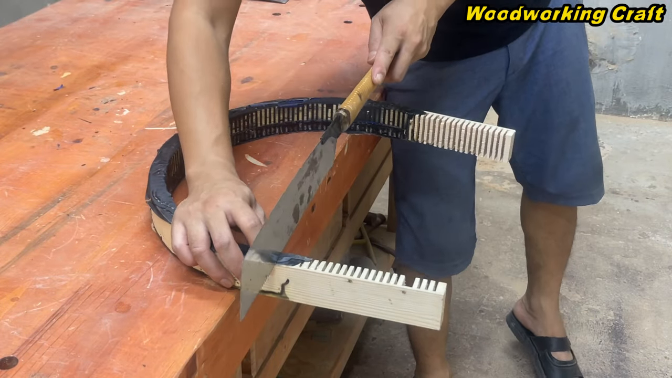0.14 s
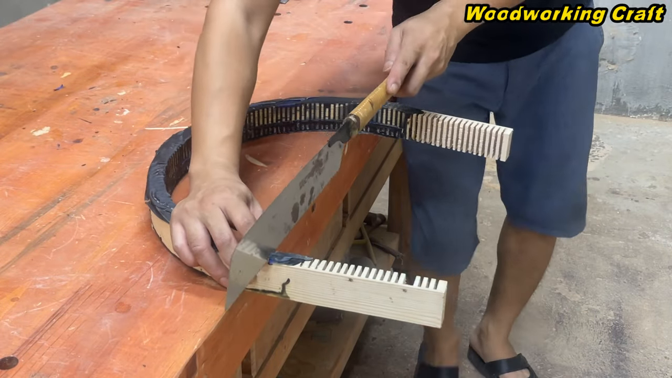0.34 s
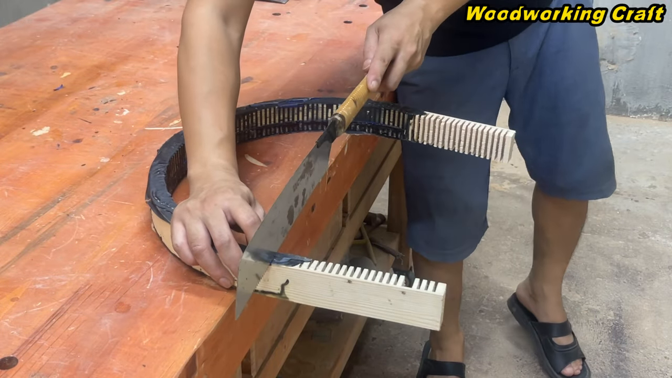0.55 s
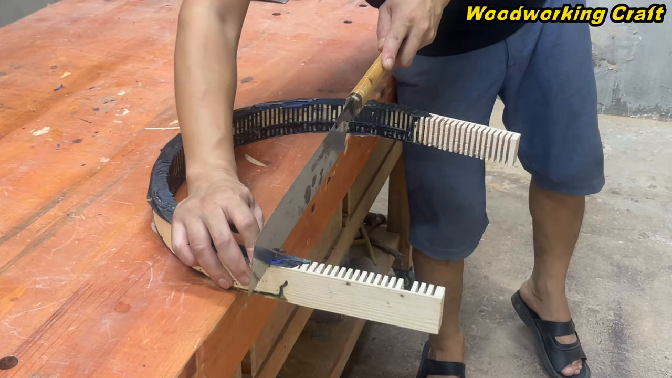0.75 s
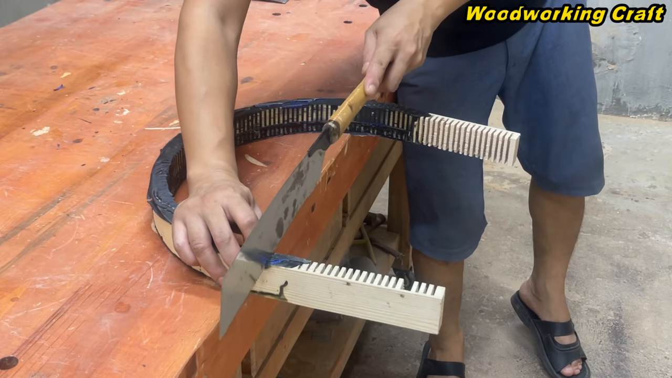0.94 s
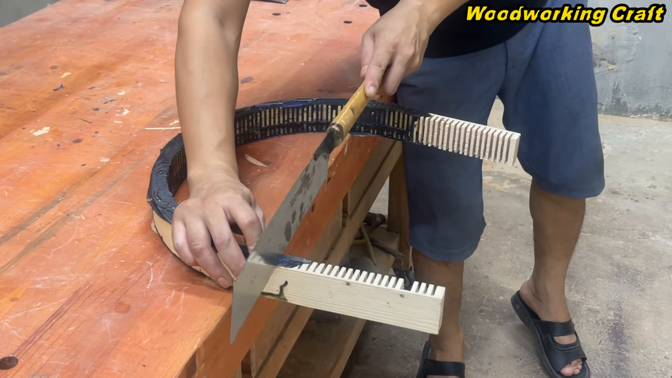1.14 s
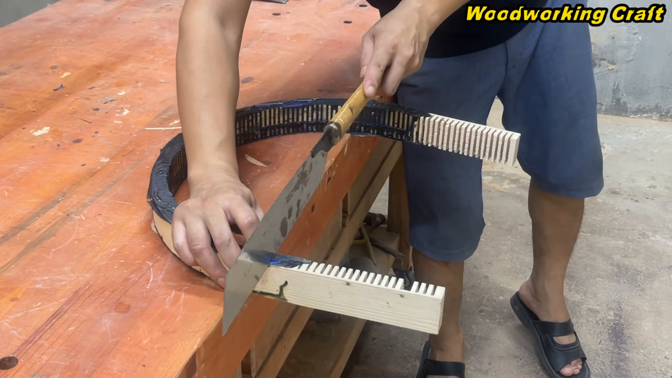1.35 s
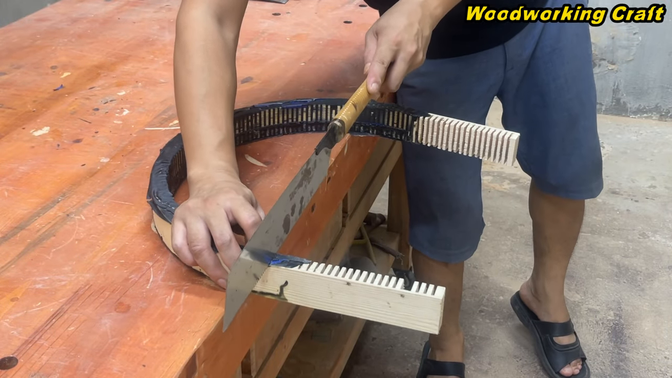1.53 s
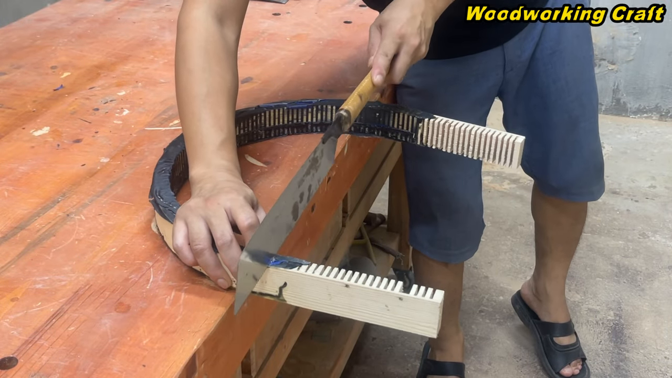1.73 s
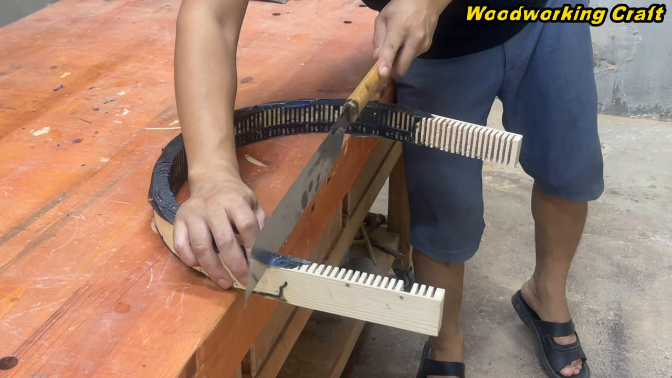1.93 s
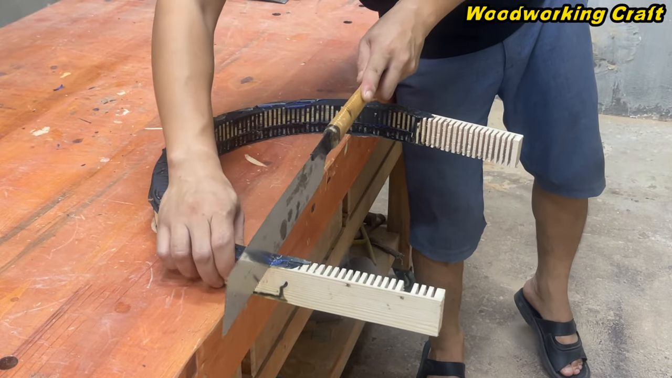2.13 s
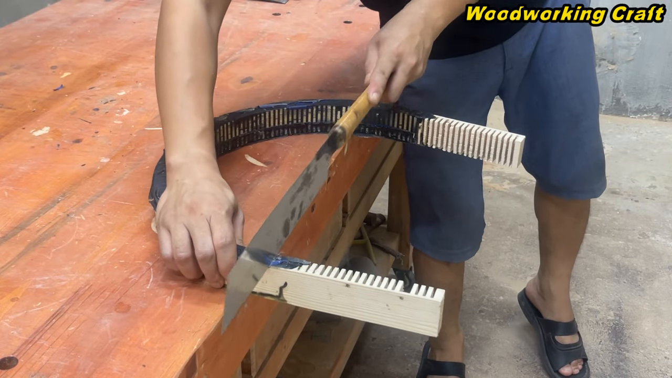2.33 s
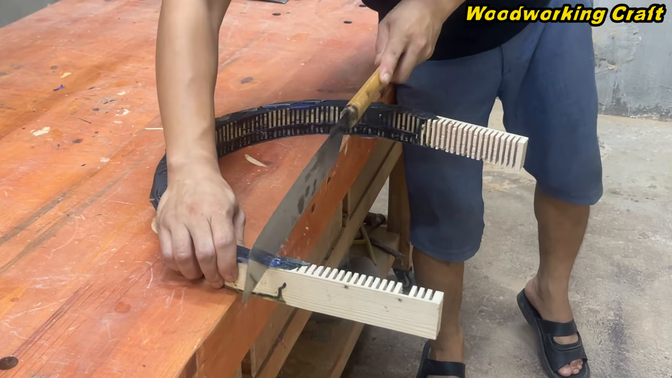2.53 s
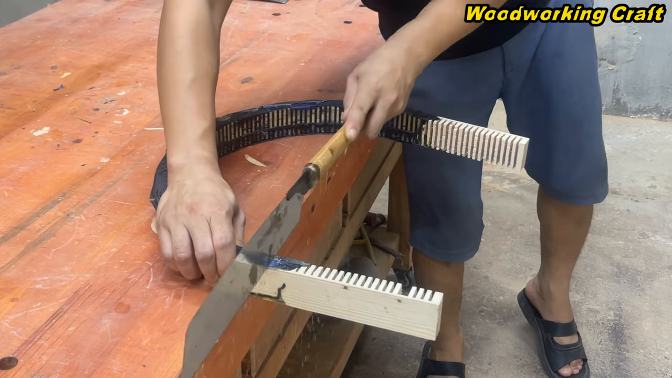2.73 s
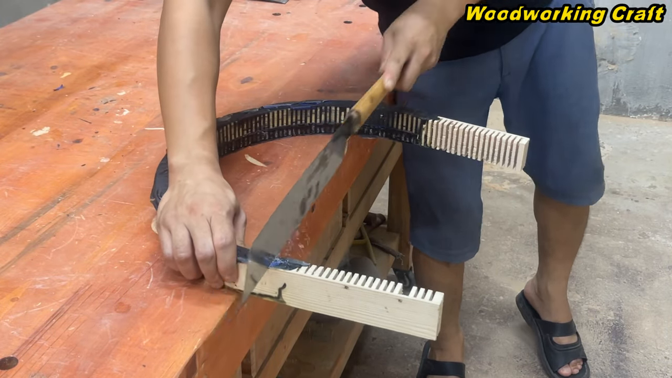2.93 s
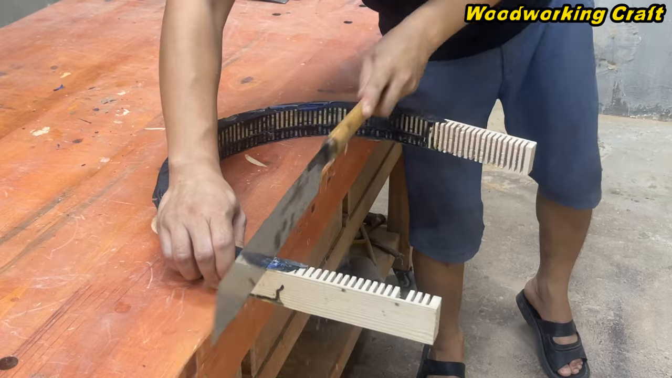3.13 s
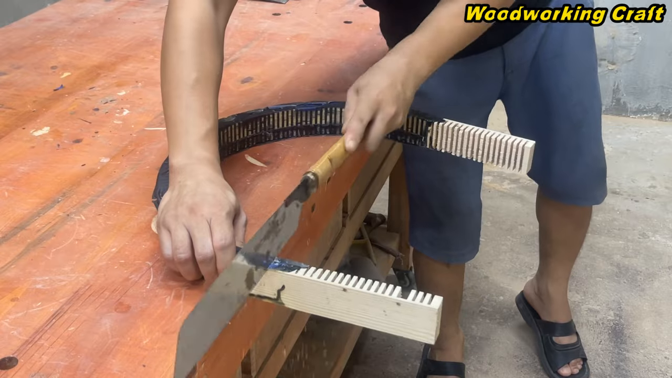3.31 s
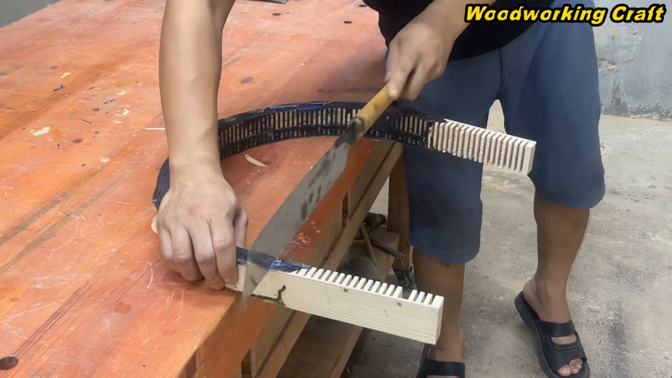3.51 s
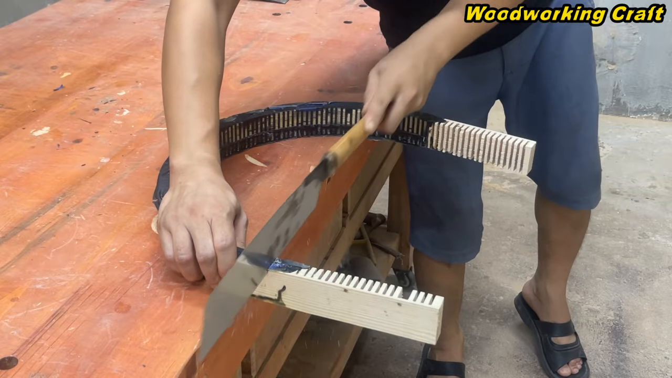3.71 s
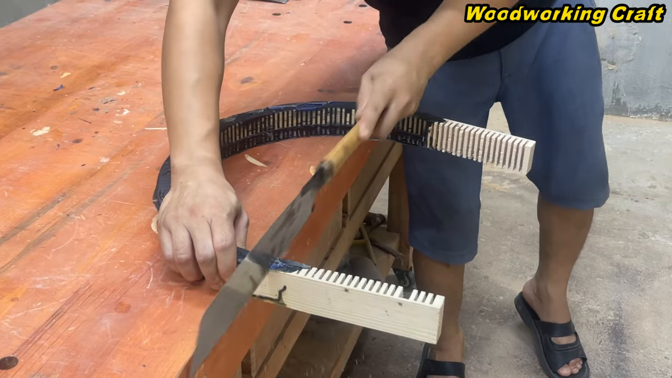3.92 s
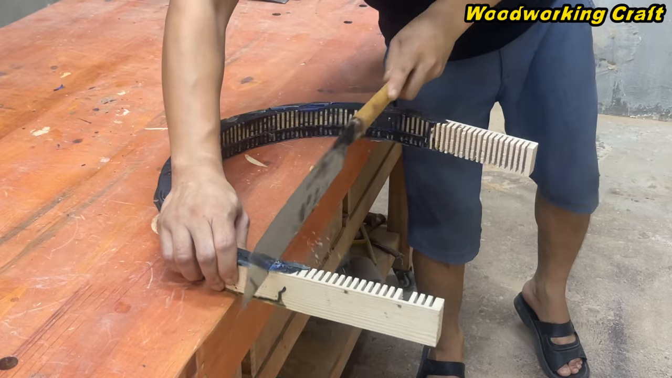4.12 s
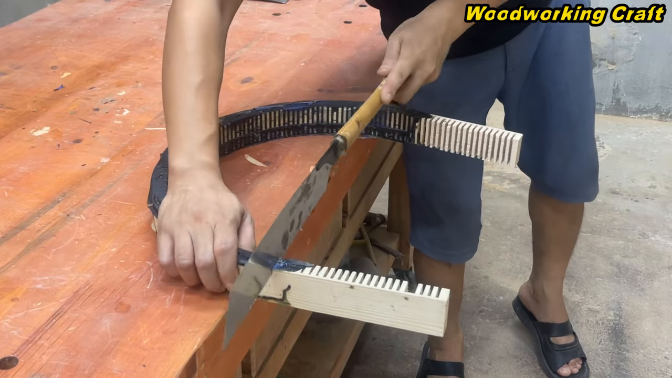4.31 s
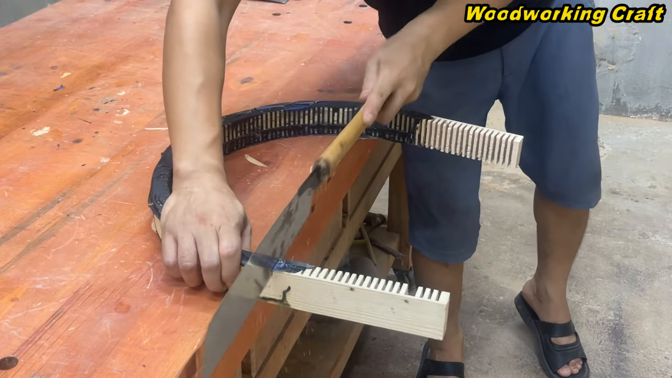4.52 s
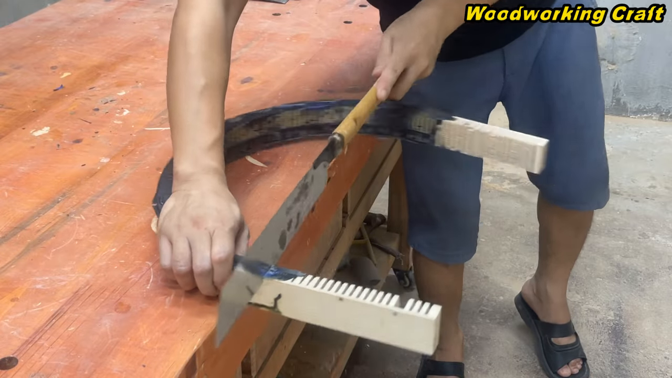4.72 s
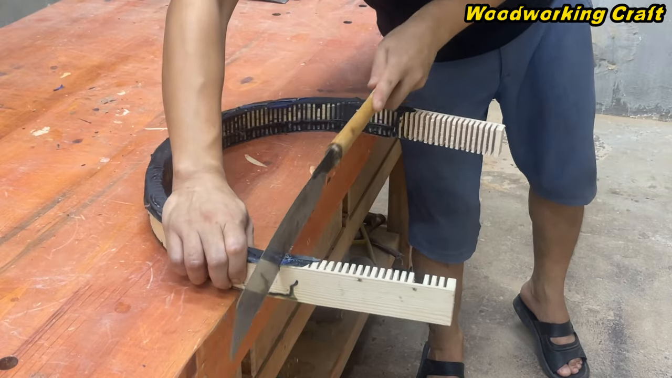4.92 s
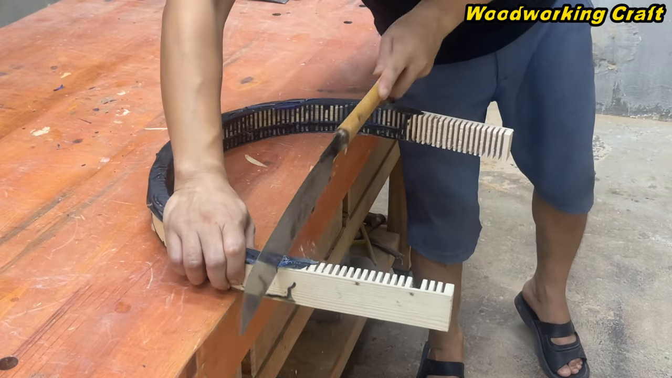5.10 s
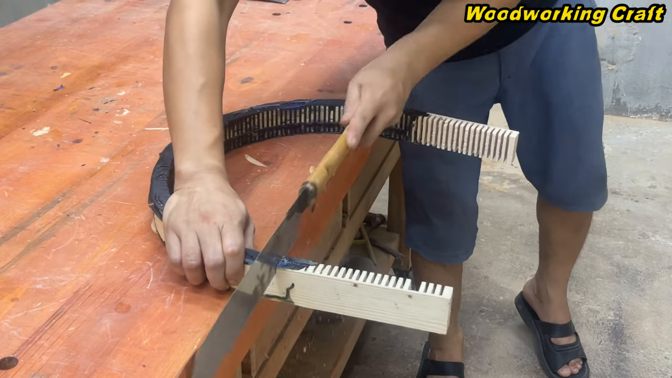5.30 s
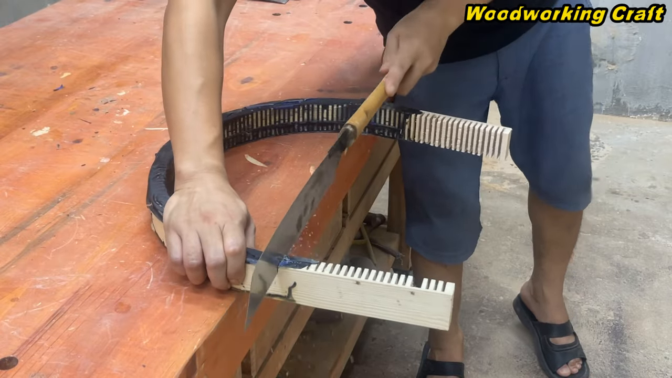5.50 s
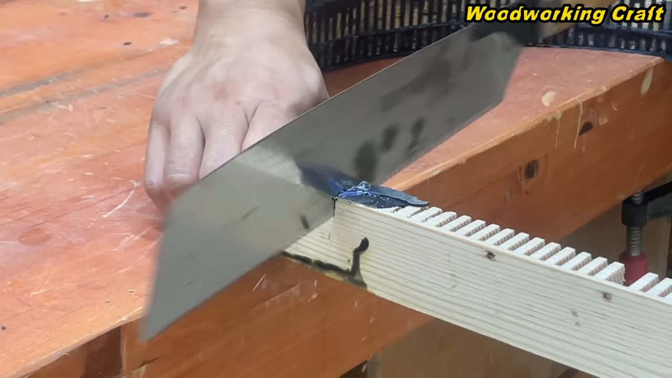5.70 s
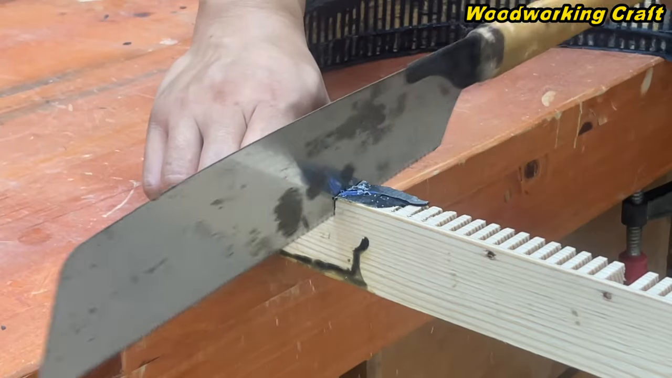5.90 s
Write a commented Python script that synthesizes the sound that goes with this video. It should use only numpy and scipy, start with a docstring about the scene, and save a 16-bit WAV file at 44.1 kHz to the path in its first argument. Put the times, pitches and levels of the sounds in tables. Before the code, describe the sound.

A hand saw rasps rapidly to and fro through softwood, woody and squeaky, with light knocks before and one loud jam midway through the cutting.

```python
"""A pull saw cuts a clamped softwood strip. First steel ticks and taps of the blade at the kerf: shaped noise bursts.
Then strokes, about seven to and fro a second: tooth pulses and noise drive strip and bench, fibres hiss and
hard pulls sing as gliding tones. Where the blade slows it rings faintly. Late on it jams with a loud knock and
the bench booms in decaying sines; strokes resume. A distant motor rumbles behind (noise) and hums at the end (sines).
"""
import sys
import numpy as np
from scipy import signal
from scipy.fft import rfft, irfft, next_fast_len
from scipy.io import wavfile
from scipy.ndimage import uniform_filter1d

SR = 44100
rng = np.random.default_rng(int(sys.argv[2]) if len(sys.argv) > 2 else 0)


def store_wav(level_fs):
    """Save 16-bit WAV to argv[1]."""
    pcm = np.round(np.clip(np.atleast_2d(level_fs), -1, 1) * 32767)
    wavfile.write(sys.argv[1], SR, pcm.T.astype(np.int16))


N = 262395
TIME = np.arange(N) / SR

# blade knocking or jamming: t/s, relative blow/dB, 1/e contact decay/s, low-pass corner/Hz
KNOCKS = [(0.436, -52.5, 0.0057, 2000), (0.688, -25.5, 0.015, 1500), (0.706, -28.5, 0.0074, 1500),
          (0.722, -26, 0.0089, 1510), (0.974, -22.5, 0.014, 700), (1.179, -32, 0.0095, 1200),
          (1.384, -37, 0.007, 1100), (1.519, -32, 0.009, 1300), (1.667, -24.5, 0.01, 5000),
          (1.857, -27.5, 0.0049, 3000), (1.933, -25, 0.0053, 3000), (2.174, -31.5, 0.008, 1500),
          (2.302, -21, 0.007, 2990), (2.745, -19, 0.005, 2000), (2.764, -20.5, 0.0032, 4000),
          (3.256, -28.5, 0.0034, 1990), (3.545, -29, 0.0057, 2000), (3.971, -21.5, 0.0045, 3001),
          (4.029, -20, 0.003, 3000), (4.42, -29.5, 0.02, 900), (4.473, -27, 0.012, 3000),
          (4.645, -28.5, 0.0029, 2982), (4.774, -13.5, 0.0053, 6000), (4.789, -19, 0.0029, 4000),
          (4.876, -25, 0.0067, 900), (5.904, -25, 0.0066, 1199)]
# spectrum of fibres and steel clicks: f/Hz, relative level/dB
FIBRE_SPECTRUM = [(1500, -13.5), (3200, 7.5), (4800, 13), (6300, 3.5), (7600, 7), (11000, 3), (16000, 4.5)]
# stereo width: f/Hz, gain of the side signal/dB
SIDE_WIDTH = [(100, -7.5), (280, -17.5), (550, -23), (1000, -15), (1600, -7.5), (2500, -1.5), (4500, 1),
              (7500, -6.5), (13000, -13)]
# nominal tooth rate in mid-stroke: t/s, rate/(teeth per s)
TOOTH_RATE = [(0.98, 368), (1.77, 543), (1.95, 748), (2.3, 454), (2.6, 727), (3.05, 812), (4.19, 823),
              (4.28, 366), (4.49, 760), (4.65, 680), (4.92, 421), (5.09, 890), (5.51, 784), (5.6, 497)]
# strokes, push and pull in turn: t at top speed/s, length/s, then relative levels:
# strip rasp/dB, bench shudder/dB, kerf scrape/dB, fibre hiss/dB
STROKES = [(0.981, 0.13, -34.5, -32.5, -52, -79), (1.671, 0.049, -39, -46.5, -55, -88),
           (1.767, 0.09, -34.5, -39, -52, -70.5), (1.882, 0.09, -37, -38.5, -51, -78),
           (1.947, 0.086, -33.5, -38, -51.5, -68.5), (2.036, 0.1, -43, -39.5, -58.5, -77),
           (2.222, 0.085, -34, -43, -51, -69), (2.317, 0.095, -31, -32.5, -47, -74),
           (2.382, 0.086, -31.5, -43, -47.5, -64), (2.478, 0.091, -35, -37.5, -50, -70),
           (2.542, 0.074, -32, -37.5, -48.5, -65.5), (2.612, 0.081, -35, -38, -46.5, -69),
           (2.686, 0.082, -31.5, -34, -47.5, -64), (2.758, 0.078, -33, -35, -47.5, -70),
           (2.829, 0.079, -32, -38, -47, -63.5), (2.897, 0.077, -32, -36, -48.5, -66),
           (2.967, 0.081, -31.5, -38, -44.5, -63), (3.042, 0.081, -33.5, -35, -44.5, -69),
           (3.111, 0.081, -31, -34.5, -46, -62.5), (3.182, 0.085, -36, -39, -48.5, -69.5),
           (3.262, 0.082, -37, -40, -55, -66), (3.332, 0.077, -34.5, -39, -48.5, -72),
           (3.401, 0.089, -32, -35.5, -45.5, -62.5), (3.482, 0.084, -32, -36.5, -46, -63.5),
           (3.552, 0.077, -31.5, -35, -48, -63), (3.623, 0.074, -35, -37, -46, -65.5),
           (3.688, 0.079, -34.5, -35, -49, -60), (3.763, 0.078, -34, -39, -47.0, -67),
           (3.833, 0.085, -32, -34.5, -45.5, -62), (3.906, 0.084, -35.5, -36, -45, -66.5),
           (3.978, 0.078, -32, -34, -45.5, -62.5), (4.049, 0.082, -31, -36.5, -50, -68),
           (4.122, 0.077, -33, -36, -49, -60.5), (4.186, 0.076, -36.5, -46, -55.5, -72),
           (4.251, 0.1, -41.5, -39.5, -57, -76), (4.497, 0.074, -33.5, -34, -55.5, -72),
           (4.571, 0.077, -35, -34, -52.5, -67), (4.633, 0.09, -34, -33.5, -49.5, -63),
           (4.908, 0.13, -35, -32.5, -54, -74), (5.034, 0.058, -39, -34, -50, -68.5),
           (5.096, 0.076, -35, -43, -48.5, -64), (5.168, 0.073, -39.5, -41, -49.5, -68),
           (5.232, 0.078, -34, -33.5, -52, -63.5), (5.301, 0.072, -41, -36.5, -52.5, -66),
           (5.367, 0.076, -38, -39.5, -53, -63.5), (5.443, 0.073, -37.5, -43.5, -53, -69.5),
           (5.503, 0.079, -34, -36, -47.5, -64.5), (5.585, 0.085, -41.5, -37.5, -59, -67),
           (5.664, 0.083, -50, -38, -57.5, -66.5), (5.77, 0.074, -40.5, -44, -51, -66.5),
           (5.826, 0.082, -46, -48, -56.0, -66.5), (5.915, 0.083, -44, -36, -50, -65.5)]


def amp(db):
    """Decibels to gain."""
    return 10 ** (np.asarray(db) / 20)


def rms(x):
    """Root mean square."""
    return np.sqrt(np.mean(x ** 2) + 1e-20)


def read(points, hz):
    """Interpolate (f/Hz, value) linearly over log frequency."""
    f, value = np.transpose(points)
    return np.interp(np.log(hz + 1), np.log(f), value)


def over_time(points):
    """Interpolate (t/s, value) linearly over the scene."""
    return np.interp(TIME, *np.transpose(points))


def add(mix, start_s, sound):
    """Add a sound to the mix in place from start_s."""
    part = mix[max(round(start_s * SR), 0):][:len(sound)]
    part += sound[:len(part)]


def colour(x, points):
    """Filter x by a spectrum of (f/Hz, gain/dB)."""
    size = next_fast_len(N + 4096, True)
    gain = amp(read(points, np.fft.rfftfreq(size, 1 / SR)))
    return irfft(rfft(x, size) * gain, size)[..., :N]


def wander(hz):
    """Random curve: unit-variance knots, hz per second, joined by lines."""
    knots = rng.standard_normal(N // 8)
    return np.interp(TIME * hz, np.arange(len(knots)), knots)


def through(x, response):
    """Convolve x with an impulse response."""
    return signal.oaconvolve(x, response)[:N]


def still_air():
    """Still air: steady coloured stereo noise, as (middle, side)."""
    # f/Hz, relative level/dB
    air_spectrum = [(18, -75), (30, -59.5), (140, 8), (197, -11), (455, 0.5), (492, -20.5), (970, -14.5),
                    (1050, 5.5), (1290, -19), (1550, -2.5), (5170, -12.5), (15500, -22)]
    level_db = -74
    noise = colour(rng.standard_normal((2, N)), air_spectrum)
    return amp(level_db) * noise / rms(noise)


def motor():
    """Distant motor: coloured-noise rumble plus sines at multiples of a wavering rate, as (middle, side)."""
    # rumble spectrum: f/Hz, relative level/dB
    rumble_spectrum = [(30, -26.5), (70, -32.5), (100, -10.5), (122, -6), (152, 5.5), (185, -6.5),
                       (300, -7), (700, -38), (3000, -88)]
    # rumble: t/s, level/dB
    rumble_level = [(0, -80.5), (1.25, -76), (1.4, -60.5), (3.5, -64.5), (4.6, -62), (5.95, -56.5)]
    # hum orders: multiple of the motor rate, relative level/dB
    orders = [(2, -15.5), (3, -9), (4, -2), (7, -5), (8, -2), (10, -14)]
    # swell of the hum orders: t/s, gain/dB
    hum_gain = [(0, -100), (5.57, -75), (5.59, -47), (5.75, -47), (5.95, -47)]
    # strongest order, swelling on its own: t/s, level/dB
    drone_level = [(5.55, -120), (5.62, -56), (5.66, -46), (5.71, -55), (5.74, -43), (5.85, -40),
                   (5.9, -35), (5.95, -36)]
    mean_rate_hz, drone_order = 61.8, 5
    rumble = colour(rng.standard_normal((2, N)), rumble_spectrum)
    middle, side = amp(over_time(rumble_level)) * rumble / rms(rumble)
    turns = np.cumsum(mean_rate_hz * (1 + 0.005 * wander(14))) / SR
    hum = np.zeros(N)
    for multiple, db in orders:
        level = amp(db + 3.0 * wander(14))
        hum += level * np.sin(2 * np.pi * (round(multiple) * turns + rng.random()))
    drone = amp(over_time(drone_level)) * np.sin(2 * np.pi * drone_order * turns)
    middle = middle + amp(over_time(hum_gain)) * hum + drone
    return np.array([middle, side])


def background():
    """Still air and motor, decoded from middle and side to left and right."""
    middle, side = still_air() + motor()
    side = colour(side, SIDE_WIDTH)
    return np.array([middle + side, middle - side])


def tail(early_share, early_s):
    """Unit-energy reflections: a quick cluster from bench and floor plus a tail decaying by band."""
    # late tail: f/Hz, t60/s
    late_t60 = [(150, 2), (500, 0.74), (1400, 0.35), (4000, 1.5), (12000, 0.16)]
    taps = rng.choice([-1., 1.], SR // 2) * (rng.random(SR // 2) < 3000 / SR)  # about 3000 per s
    taps[:SR // 400] = 0  # silent for the first 2.5 ms
    hz, t, z = signal.stft(taps, SR, nperseg=256)
    late = amp(-60 * t / read(late_t60, hz)[:, None])
    early = early_share * np.exp(-t / early_s)
    out = signal.istft(z * (late + early), SR, nperseg=256)[1]
    return out / np.linalg.norm(out)


def reflected(x, early_share, early_s, count=5):
    """Blade and arm move, so the reflections crossfade from one tail to the next with each stroke."""
    times = np.transpose(STROKES)[0]
    place = np.interp(TIME, times, np.arange(len(times)))
    out = np.zeros(N)
    for k in range(count):
        distance = abs((place - k + count / 2) % count - count / 2)  # cyclic
        share = np.cos(np.pi / 2 * np.minimum(distance, 1))
        out += through(x * share, tail(early_share, early_s))
    return out


def room(x, wet_db):
    """Direct sound and reflections in the middle; side reflections widen the upper midrange."""
    wet = amp(wet_db)
    middle = (x + wet * reflected(x, early_share=2.45, early_s=0.04)) / np.sqrt(1 + wet ** 2)
    side = colour(reflected(x, early_share=8.7, early_s=0.008, count=3), SIDE_WIDTH)
    return np.array([middle + side, middle - side])


def wood(low_hz, high_hz, ring=0.74, size=16384):
    """Minimum-phase response of strip and bench in a band; ring scales the dB height of the resonances."""
    # broad response: f/Hz, gain/dB
    broad = [(40, -58.5), (100, -23.5), (220, -22.5), (300, -6), (400, 2.5), (560, 0.5), (800, -2.5),
             (950, -2), (1740, -9.5), (1880, -13), (2750, -18), (3150, -27), (4500, -40), (9000, -63.5)]
    # resonances: f/Hz, width/Hz, height over the broad response before ring/dB
    modes = [(300, 6, 13), (356, 10, 5), (379, 10, 12), (441, 20, 8.5), (478, 10, 5), (624, 12, 10),
             (669, 12, 11), (740, 18, 10), (787, 12, 10.5), (853, 12, 10), (1016, 30, 4), (1170, 18, 9),
             (1240, 18, 8), (1302, 18, 6), (1438, 18, 7), (1561, 10, 6), (1619, 12, 13), (1685, 26, 6),
             (1780, 20, 5), (1920, 30, 6), (2150, 38, 4), (2310, 24, 4), (2680, 40, 4), (3770, 50, 6)]
    hz = abs(np.fft.fftfreq(size, 1 / SR)) + 1
    peaks = 0
    for f, width, db in modes:
        peaks = peaks + (amp(ring * db) ** 2 - 1) / (1 + (2 * (hz - f) / width) ** 2)
    band = 1 / (1 + (low_hz / hz) ** 8) / (1 + (hz / high_hz) ** 8)
    gain = amp(read(broad, hz)) * np.sqrt(np.maximum(1 + peaks, 1e-2) * band)
    log_gain = np.log(gain + 1e-5)
    # the Hilbert transform of the log gain gives the phase of a causal response
    return np.fft.ifft(np.exp(np.conj(signal.hilbert(log_gain)))).real[:size // 2]


def swell(levels_db, sharpness):
    """Force over time: a half-sine speed per stroke, raised to sharpness; the wrist rounds the turns."""
    power = np.zeros(N)
    for (s, length_s, *_), db in zip(STROKES, levels_db):
        speed = abs(np.sin(np.linspace(0, np.pi, round(length_s * SR))))
        add(power, s - length_s / 2, (amp(db) * speed ** sharpness) ** 2)
    return uniform_filter1d(np.sqrt(power), size=250)


def thumps():
    """Dull thumps: short low swings through zero, low-passed."""
    # t/s, level before the low-pass/dB, 1/e decay/s
    thump_levels = [(4.776, -66, .012), (5.583, -41, .004)]
    out = np.zeros(N)
    t = np.arange(SR // 5) / SR
    for s, db, fade_s in thump_levels:
        add(out, s, amp(db) * (1 - t / fade_s) * np.exp(-t / fade_s))
    return signal.sosfilt(signal.butter(2, 160, fs=SR, output="sos"), out)


def booms():
    """Heavy blows ring the whole bench in its low modes: decaying sines."""
    # t/s, level/dB
    boom_levels = [(0.70, -51), (0.975, -35.5), (4.777, -27.5), (4.876, -39.5)]
    # bench modes: f/Hz, relative level/dB, t60/s
    bench_modes = [(88, -36.5, 0.19), (124.3, -20, 0.33), (186, -14, 0.13), (247, -11, 0.14),
                   (301.7, -2.5, .6)]
    out = np.zeros(N)
    t = np.arange(SR) / SR
    for s, boom_db in boom_levels:
        for hz, db, t60_s in bench_modes:
            envelope = (1 - np.exp(-t / 0.0047)) * np.exp(-np.log(1000) * t / t60_s)
            tone = np.sin(2 * np.pi * (hz * t + rng.random()))
            add(out, s, amp(boom_db + db) * envelope * tone)
    return out


def clicks():
    """Thin click of the steel, alone or in every blow: decaying coloured noise."""
    # bare steel as the saw is set in place: t/s, relative level/dB, 1/e decay/s
    ticks = [(0.388, -50, 0.016), (0.686, -41, 0.0045), (0.694, -48, 0.0034), (0.707, -47, 0.016)]
    click_re_blow_db = -35.5
    in_blows = [(s, db + click_re_blow_db, contact_s) for s, db, contact_s, _ in KNOCKS]
    out = np.zeros(N)
    t = np.arange(SR // 10) / SR
    for s, db, fade_s in list(ticks) + in_blows:
        add(out, s, amp(db) * rng.standard_normal(len(t)) * np.exp(-t / fade_s))
    return amp(-16.0) * colour(out, FIBRE_SPECTRUM)


def knocks():
    """Each blow is a quick chatter of teeth, a low-passed noise burst driving the wood."""
    blows = np.zeros(N)
    t = np.arange(SR // 10) / SR
    for s, blow_db, contact_s, dull_hz in KNOCKS:
        chatter = rng.standard_normal(len(t)) * np.exp(-t / contact_s)
        force = chatter * (1 - np.exp(-t / (0.39 * contact_s)))  # longer contacts build up more slowly
        force = amp(blow_db) * force / np.linalg.norm(force)
        keep = np.exp(-2 * np.pi * dull_hz / SR)
        add(blows, s, signal.lfilter([1 - keep], [1, -keep], force))
    # colour of the blows: f/Hz, gain/dB
    blows = colour(blows, [(120, 0.5), (200, 6.0), (430, -1), (650, -2),
                           (900, 0), (1400, 1.5), (2200, -0.5), (3200, 2)])
    response = wood(low_hz=117, high_hz=3340)
    return amp(4.5) * through(blows, response / abs(response).max())


def blade():
    """Light rubbing wakes a mode of the steel: a rough sine that glides as the blade flexes."""
    # t of the centre/s, length/s, f/Hz, glide/(share of f), mean level/dB
    rings = [(1.83, .05, 2690, .06, -53), (1.82, .06, 3930, 0, -68), (4.245, .04, 2500, 0, -55),
             (4.245, .05, 3760, 0, -66), (4.282, .035, 2490, -.02, -57), (4.33, .07, 2470, -.02, -57.5),
             (4.323, .045, 3700, .02, -68), (4.365, .04, 2440, -.02, -64), (4.36, .06, 3520, -.12, -74)]
    out = np.zeros(N)
    for s, length_s, hz, glide, db in rings:
        size = round(length_s * SR)
        bend = glide * np.linspace(-.5, .5, size) + 0.018 * wander(300)[:size]
        turns = np.cumsum(hz * (1 + bend)) / SR
        level = amp(db + 3 * wander(150)[:size])
        add(out, s - length_s / 2, level * np.hanning(size) * np.sin(2 * np.pi * turns))
    return out


def fibres():
    """Fibres snap at the teeth: a fine, flickering noise hiss that follows each stroke."""
    flicker_db = 2.0 * wander(1500) + 1.4 * wander(130)
    snaps = colour(rng.standard_normal(N) * amp(flicker_db), FIBRE_SPECTRUM)
    return amp(-0.5) * snaps / rms(snaps) * swell(np.transpose(STROKES)[-1], sharpness=1.23)


def rounded_bites():
    """A few teeth bite in step: short round two-partial blips near the tooth rate, varied in pitch and colour."""
    runs_per_s, run_s, spread_octaves = 55, .016, .16
    fundamental_db, octave_db = 2.5, -5.0  # means, re the stroke's rasp level
    out = np.zeros(N)
    draws = rng.standard_normal((int(N / SR * runs_per_s), 5))
    for k, (late, pitch, size, bright, span) in enumerate(draws):
        s = (k + .3 * late) / runs_per_s
        t = np.arange(round(SR * run_s * 1.25 ** span)) / SR
        hz = 0.92 * np.interp(s, *np.transpose(TOOTH_RATE)) * 2 ** (spread_octaves * pitch)
        tone = amp(fundamental_db + 2.5 * np.tanh(size)) * np.sin(2 * np.pi * hz * t)
        octave = amp(octave_db + 4 * np.tanh(bright)) * np.sin(4 * np.pi * hz * t)
        add(out, s, np.hanning(len(t)) * (tone + octave))
    return out * swell(np.transpose(STROKES)[2], sharpness=0.89)


def singing():
    """Teeth bite evenly and the wood sings: whoops of three harmonics, arching in pitch with blade speed."""
    # t of the centre/s, length/s, peak tooth rate/Hz, relative level/dB, relative octave level/dB
    whoops = [(1.95, 0.062, 797.6, -27, -40), (2.61, 0.027, 753.6, -25, -49),
              (2.685, 0.031, 743.4, -21, -35.5), (2.709, .035, 735.2, -36.5, -36),
              (2.829, .045, 761, -21.5, -36), (2.87, .04, 782, -43, -40.5),
              (2.97, 0.046, 801.5, -26.5, -31), (3.014, .03, 791.3, -29, -34),
              (3.115, .036, 850, -22.5, -29.5), (3.16, 0.024, 855.7, -27.5, -44),
              (3.264, .03, 744.8, -27, -53), (3.408, 0.043, 833, -26.5, -33.5),
              (3.549, .018, 827.4, -25.5, -42), (3.562, 0.049, 812.8, -29.5, -35),
              (3.599, 0.024, 823.2, -29, -36), (3.842, 0.049, 843.4, -26.5, -32.5),
              (3.985, .055, 848.5, -26, -36), (4.04, .04, 818, -30.5, -39), (4.575, 0.039, 721.4, -30, -56),
              (4.655, 0.061, 673.7, -30, -55), (5.08, .05, 502.4, -34.5, -31),
              (5.51, .035, 381, -33.5, -30), (5.605, .06, 504, -35.5, -55), (5.778, 0.049, 500, -33.5, -52),
              (5.92, .055, 477, -30.5, -67)]
    sag, jitter = 0.055, 0.018  # shares of the pitch: fall at the ends, shake
    out = np.zeros(N)
    for s, length_s, hz, db, octave_db in whoops:
        place = np.linspace(-1, 1, round(length_s * SR))
        pitch = hz * (1 - sag * place ** 2 + jitter * wander(320)[:len(place)])
        phase = 2 * np.pi * np.cumsum(pitch) / SR
        tone = amp(db) * np.sin(phase) + amp(octave_db) * np.sin(2 * phase)
        tone = tone + amp(db - 22.0) * np.sin(3 * phase)
        add(out, s - length_s / 2, np.hanning(len(place)) * tone)
    return amp(1.5) * out


def teeth_passed(sag, jitter):
    """Count of teeth across the wood; the blade is slower at the ends of a stroke."""
    s, length_s, *_ = np.transpose(STROKES)
    rate = np.interp(s, *np.transpose(TOOTH_RATE))
    now = np.searchsorted((s[1:] + s[:-1]) / 2, TIME)  # nearest stroke
    place = np.clip((TIME - s[now]) / length_s[now], -.5, .5)
    arch = 1 - sag * (2 * place) ** 2
    return np.cumsum(rate[now] * arch * (1 + jitter * wander(350))) / SR


def along_blade(x, echo, trip_s):
    """Waves run to the free blade end and back: one echo whose delay drifts as the blade slides."""
    trip = trip_s * (1 + 0.225 * wander(16))
    return x + echo * np.interp(TIME - trip, TIME, x)


def shifting(drive, count=7):
    """The contact point moves, so each bite feeds the bands of the wood differently: random band gains."""
    spread_db, changes_per_s = 5.0, 70
    log_hz = np.log(np.fft.rfftfreq(N, 1 / SR) + 1)
    place = np.interp(log_hz, np.log([350, 2800]), [0, count - 1])
    spectrum = rfft(drive)
    out = np.zeros(N)
    for k in range(count):
        band = irfft(spectrum * np.maximum(1 - abs(place - k), 0), N)
        out += band * amp(spread_db * np.tanh(wander(changes_per_s)))
    return out


def played(drive, force, response):
    """Drive scaled by force through a response, normalised so that force sets the level."""
    return through(drive * force, response) / rms(through(drive, response))


def saw():
    """Teeth strike one by one as the blade bounces: kerf scrapes, strip rasps, bench shudders."""
    # blade rubbing in the kerf: t/s, relative level/dB
    rub_level = [(0.87, -65), (0.92, -54), (1.0, -56), (1.12, -53), (1.35, -58.5), (1.6, -54.5), (2.1, -51),
                 (4.39, -56), (4.44, -52.5), (4.69, -47), (4.76, -57), (5.0, -44), (5.6, -44.5)]
    grain_db = 2.0  # hard and soft grain under the blade
    bounce_hz, bounce_db = 75.5, 2.5  # mean rate, depth
    _, _, rasp_db, shudder_db, scrape_db, _ = np.transpose(STROKES)
    teeth = teeth_passed(sag=.15, jitter=.012)
    strikes = np.diff(np.floor(teeth), prepend=0)
    bounce = np.cos(2 * np.pi * np.cumsum(bounce_hz * (1 + 0.1494 * wander(30))) / SR)
    grip = amp(grain_db * wander(130) + bounce_db * bounce)
    bites = strikes * (np.tanh(2 * rng.standard_normal(N)) + 0.27)
    tearing = rng.standard_normal(N) * np.exp(-(teeth % 1) / 0.43)  # fades between teeth
    contact = grip * (bites / rms(bites) + 0.5 * tearing / rms(tearing))
    drive = shifting(along_blade(contact, echo=0.4, trip_s=0.002985))
    rub = amp(over_time(rub_level))
    scrape_force = np.hypot(swell(scrape_db, sharpness=0.73), amp(-13.5) * rub)
    scrape = played(drive, scrape_force, wood(low_hz=1837, high_hz=12000, ring=0.79))
    rasp_force = np.hypot(swell(rasp_db, sharpness=0.55), rub)
    rasp = played(drive, rasp_force, wood(low_hz=546, high_hz=1765, ring=0.93))
    shudder_force = swell(shudder_db, sharpness=0.62)
    shudder = played(drive / np.sqrt(grip), shudder_force, wood(low_hz=90, high_hz=503, ring=0.89))
    return amp(2.5) * scrape + amp(-0.87) * rasp + amp(-1.0) * shudder


def scene():
    """Wood and steel sounds in the room, plus booms, thumps and background."""
    timber = room(saw() + rounded_bites() + knocks(), wet_db=-4.0)
    steel = room(singing() + fibres() + clicks() + blade(), wet_db=-4.0)
    return timber + steel + booms() + thumps() + background()


def record(dry):
    """Band limit: linear-phase low-pass."""
    edge_hz = 15800
    lowpass = signal.firwin(511, edge_hz, window=("kaiser", 9), fs=SR)
    return signal.oaconvolve(dry, lowpass[None], "same")


dry = scene()
out = record(dry)
store_wav(out)
```